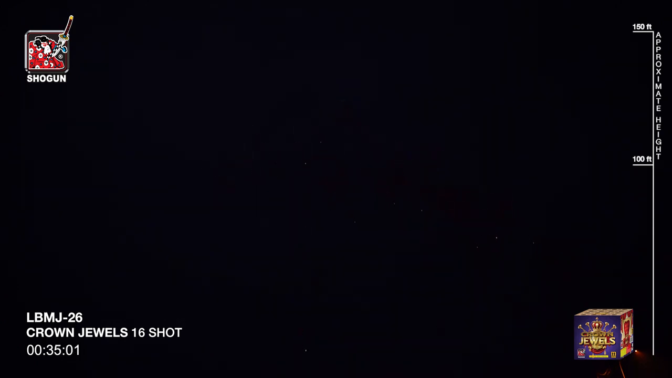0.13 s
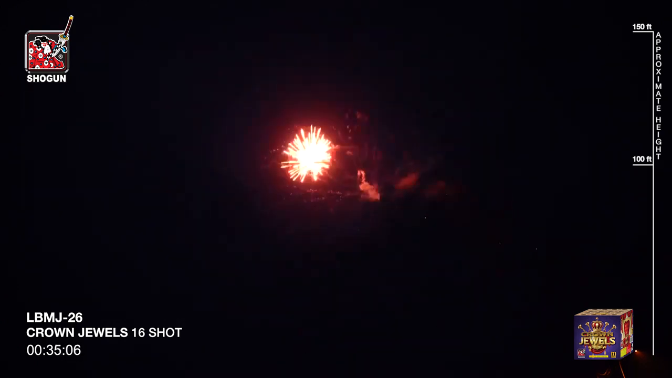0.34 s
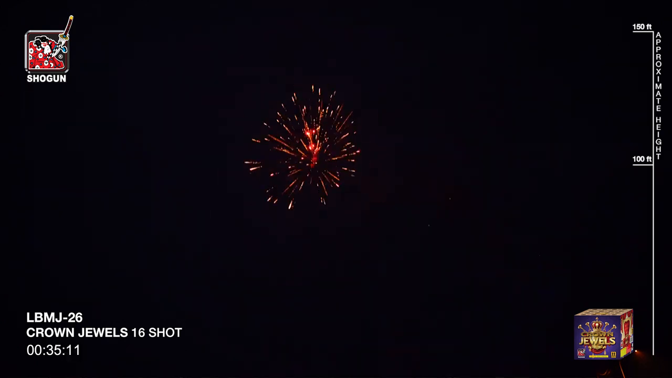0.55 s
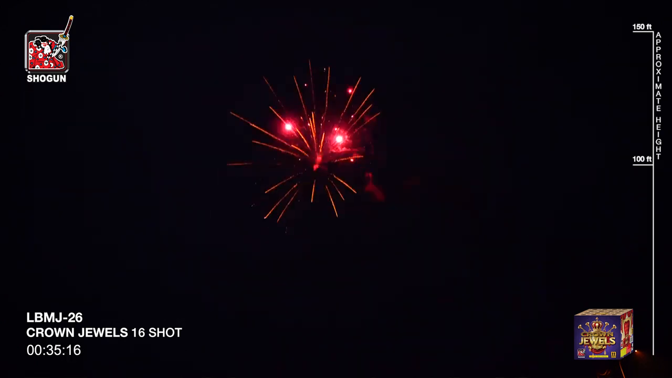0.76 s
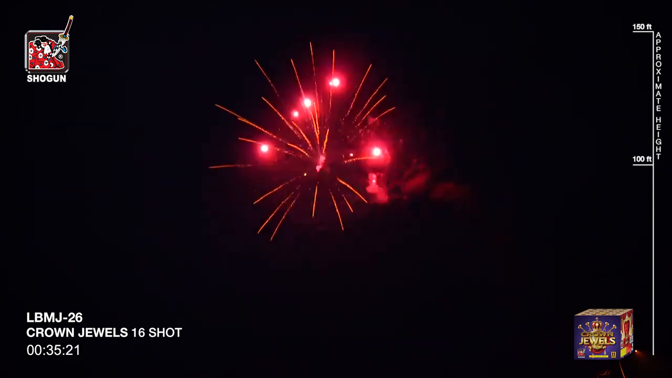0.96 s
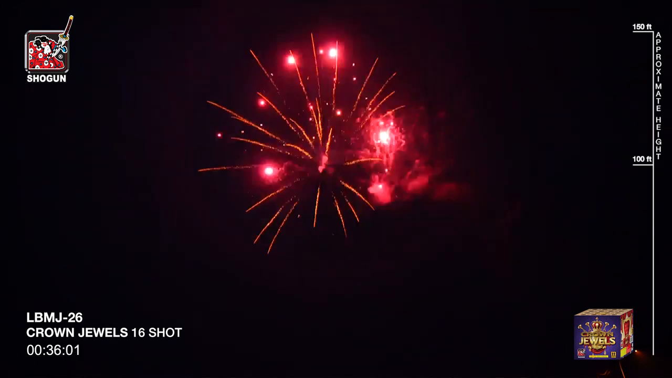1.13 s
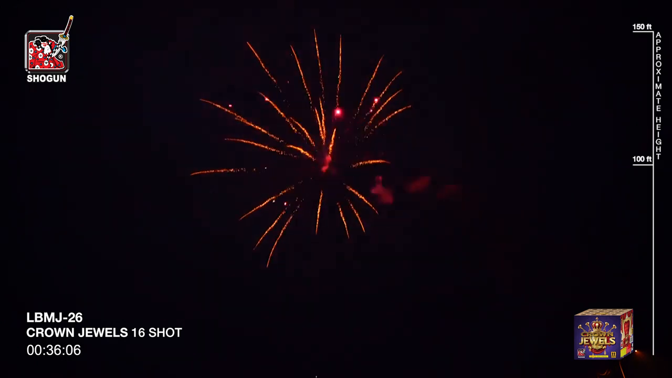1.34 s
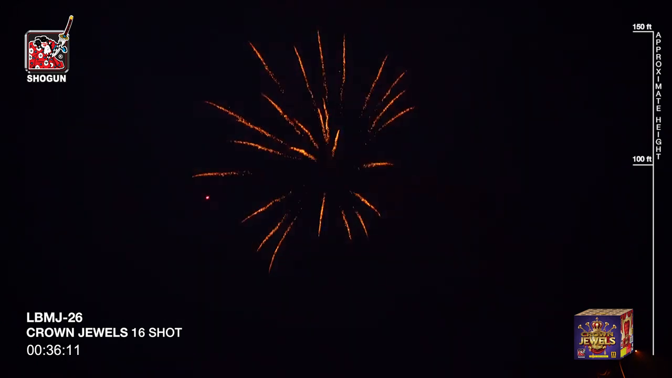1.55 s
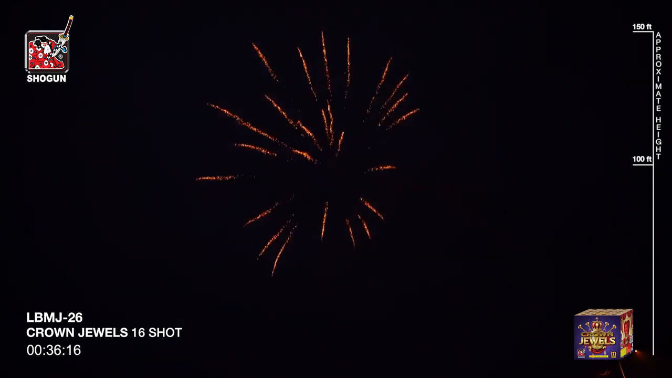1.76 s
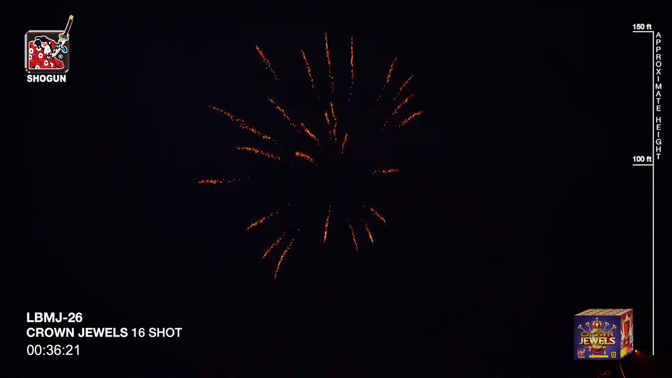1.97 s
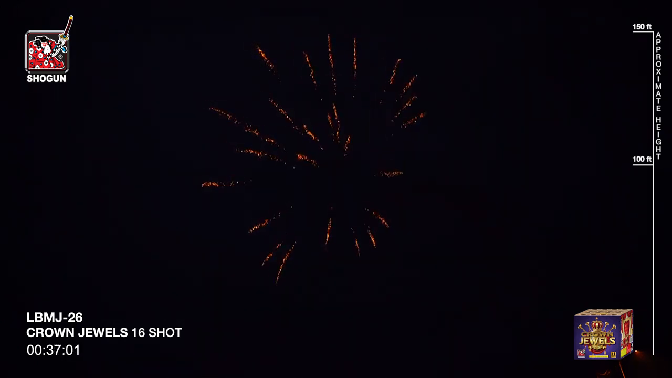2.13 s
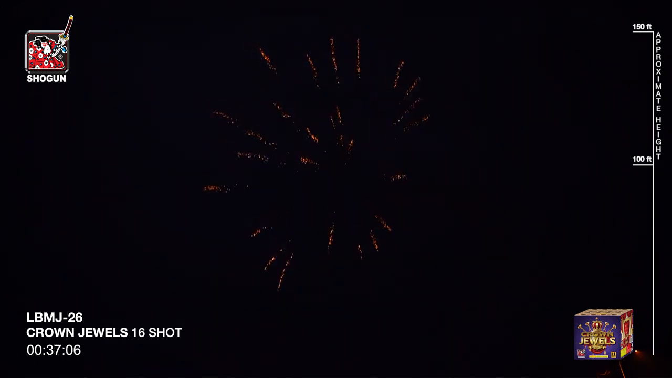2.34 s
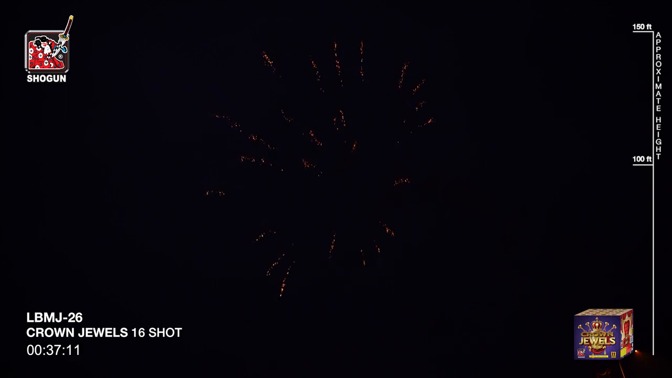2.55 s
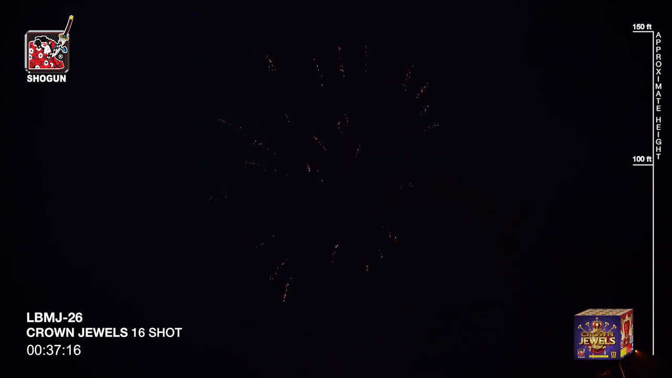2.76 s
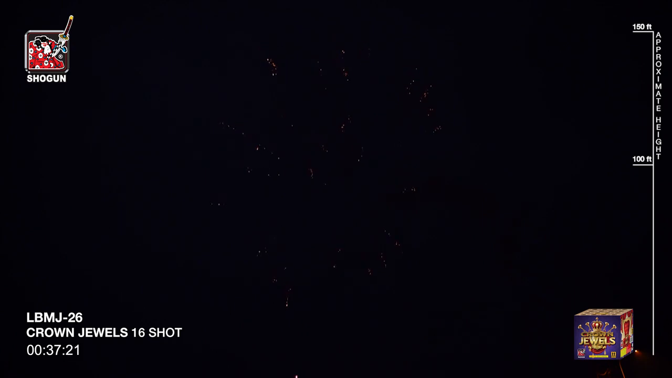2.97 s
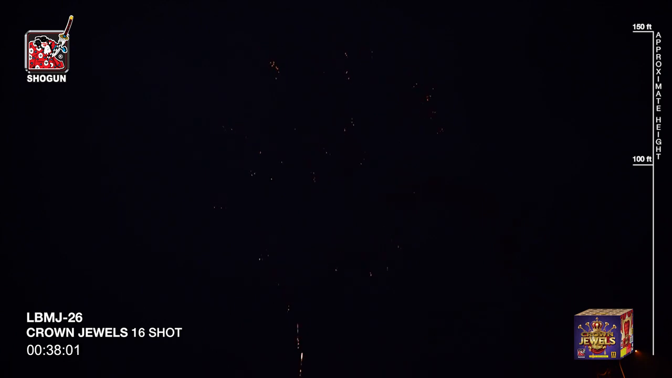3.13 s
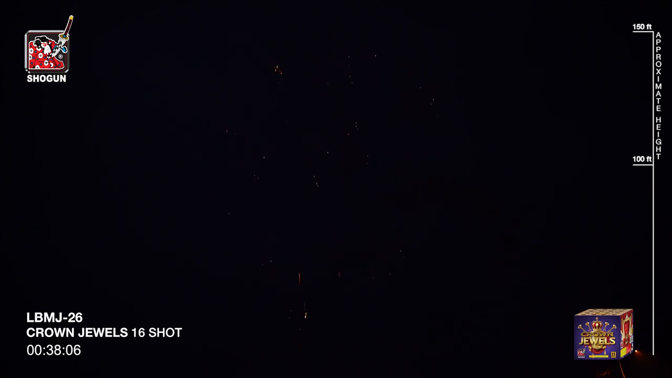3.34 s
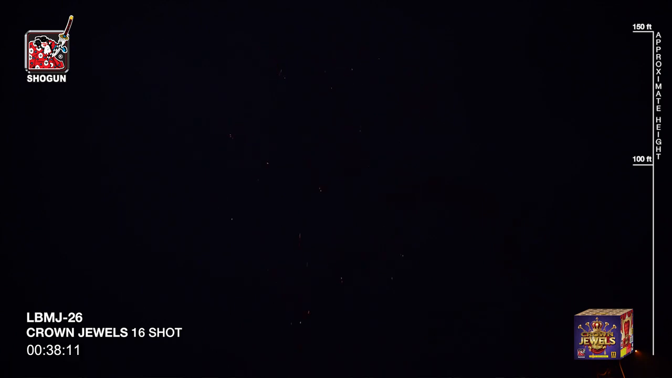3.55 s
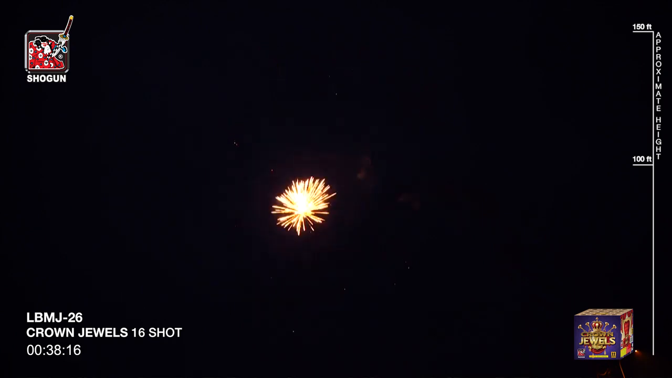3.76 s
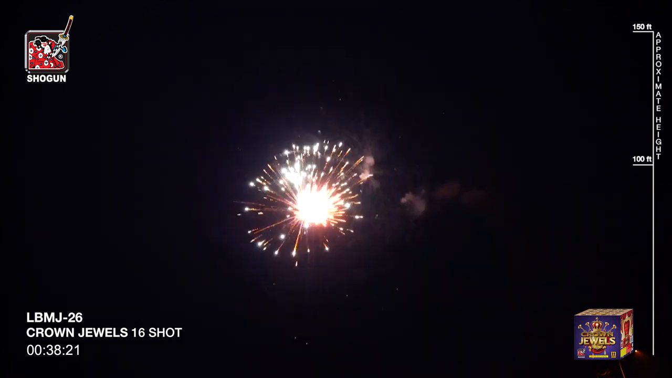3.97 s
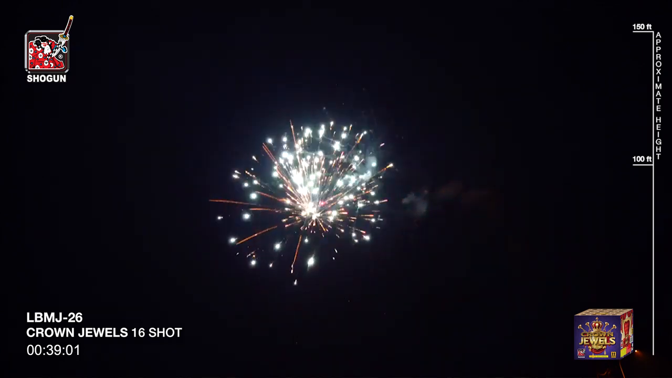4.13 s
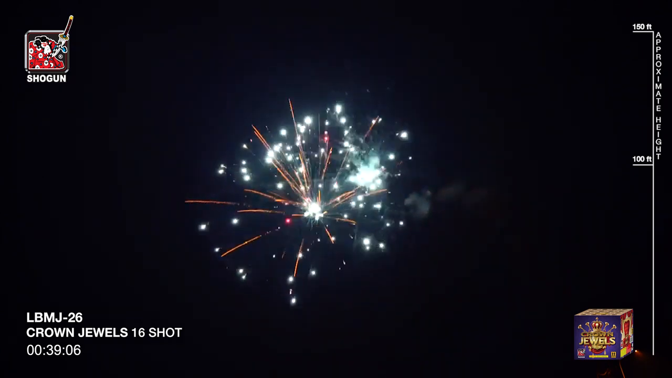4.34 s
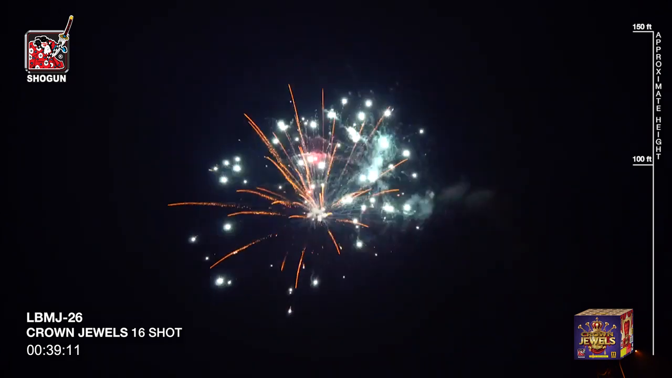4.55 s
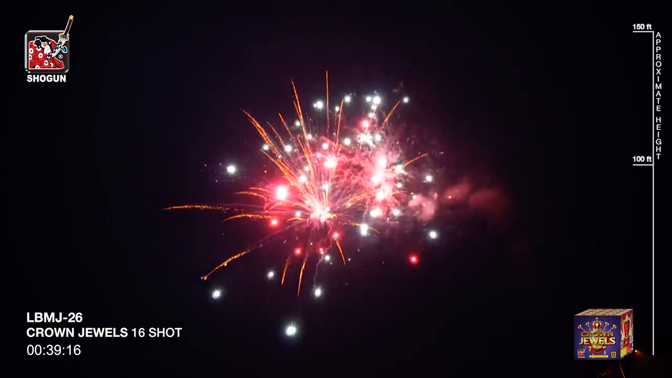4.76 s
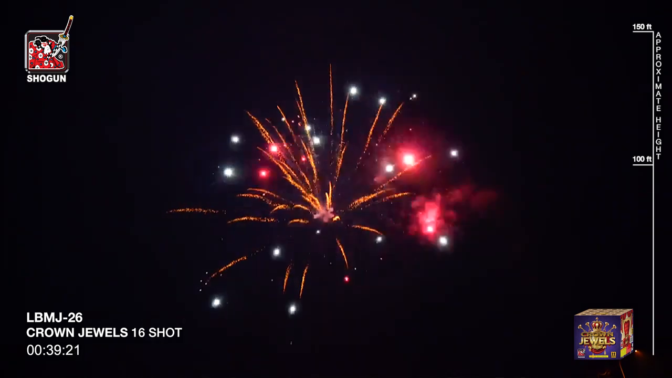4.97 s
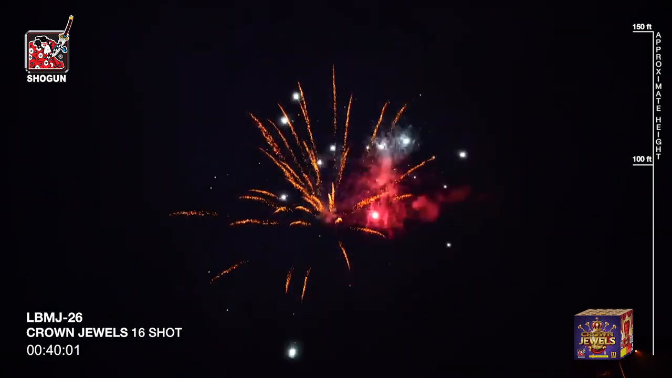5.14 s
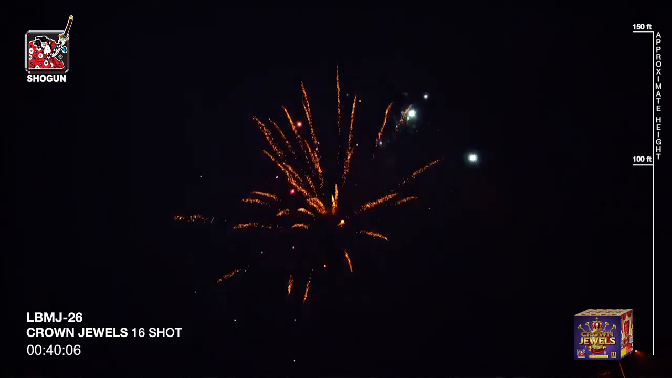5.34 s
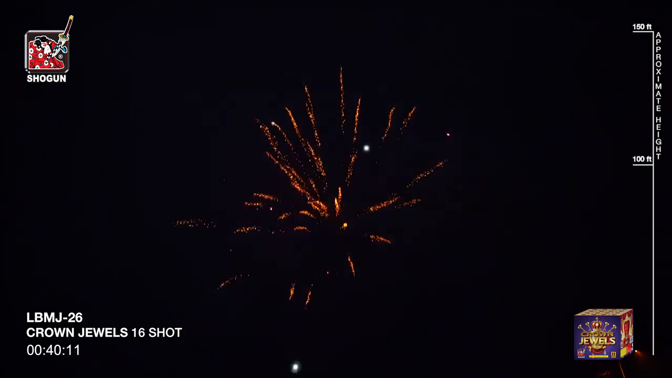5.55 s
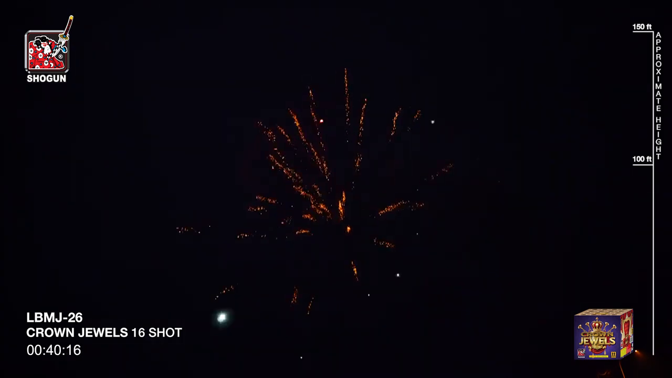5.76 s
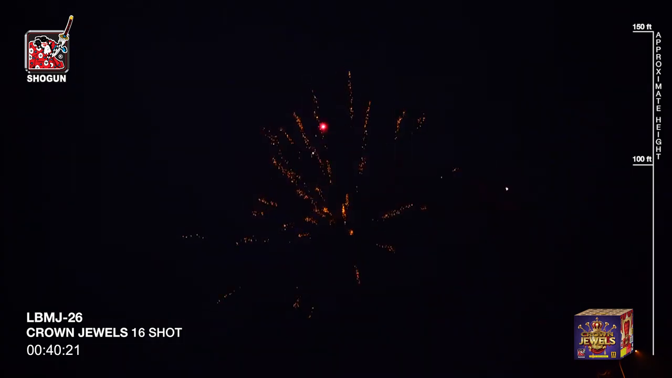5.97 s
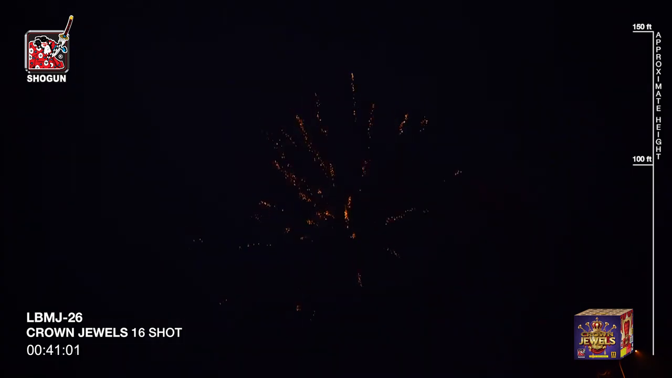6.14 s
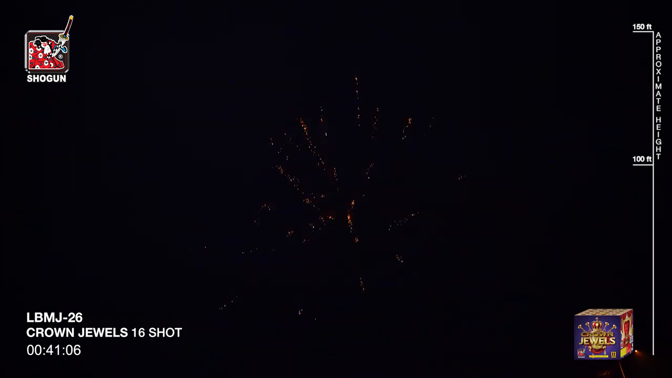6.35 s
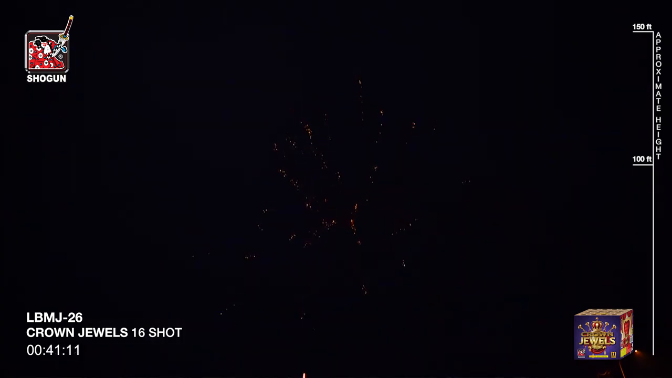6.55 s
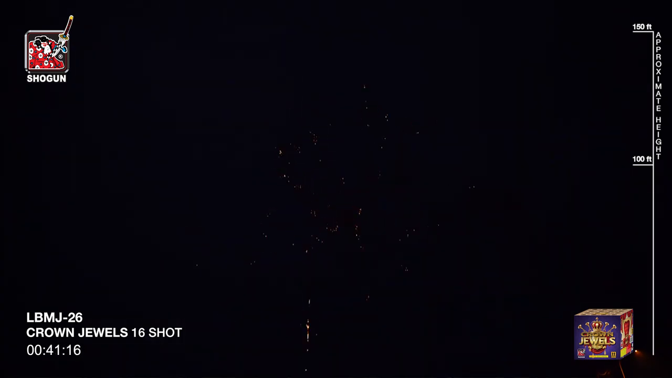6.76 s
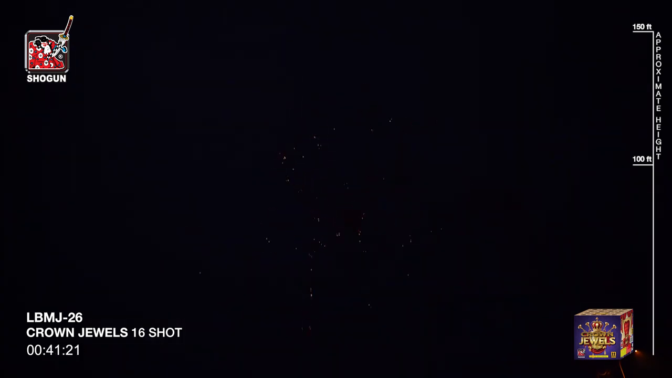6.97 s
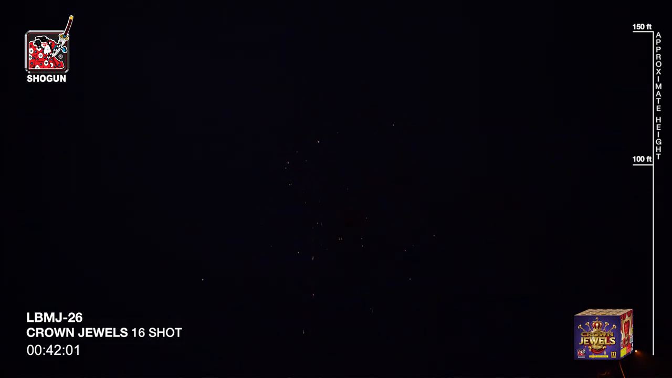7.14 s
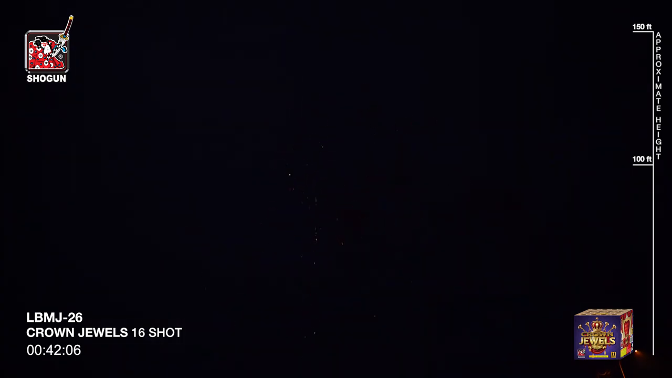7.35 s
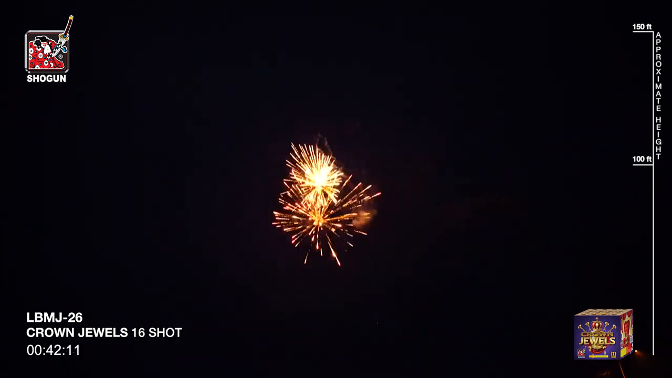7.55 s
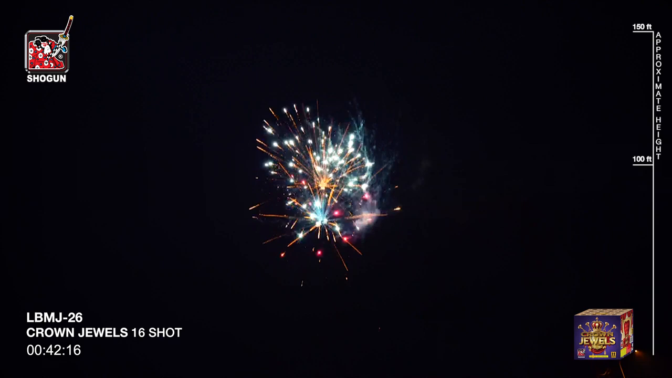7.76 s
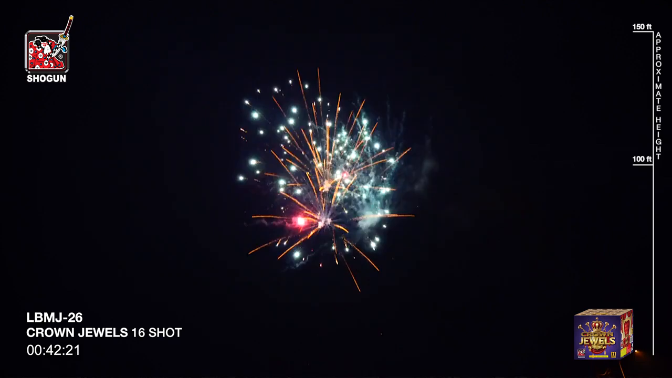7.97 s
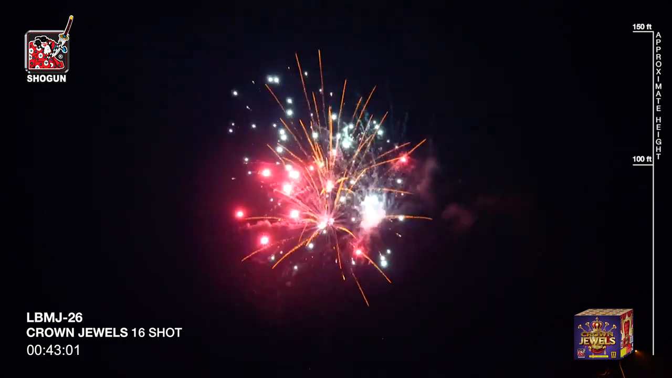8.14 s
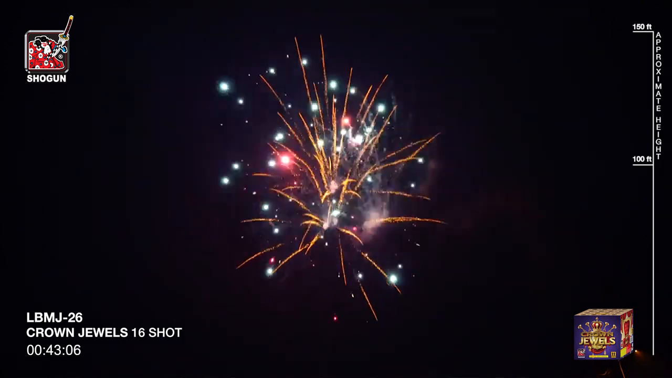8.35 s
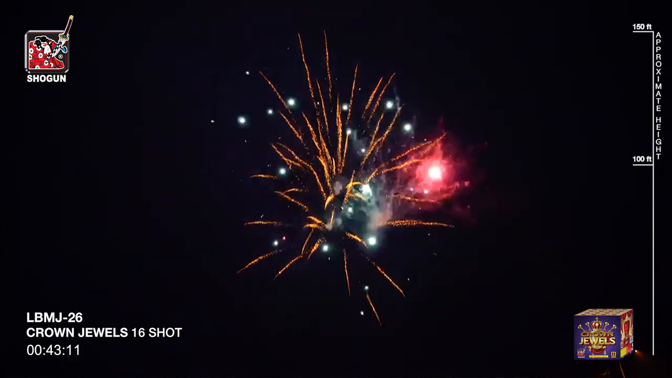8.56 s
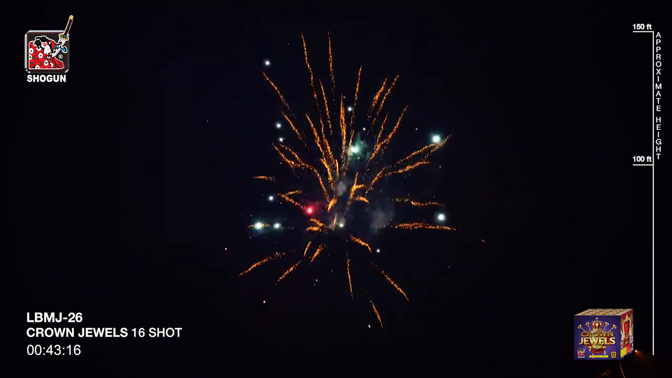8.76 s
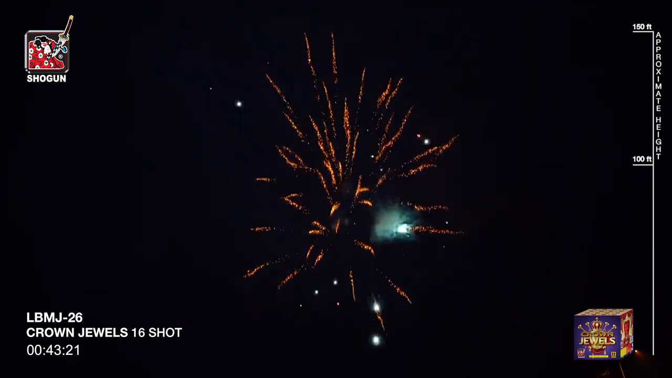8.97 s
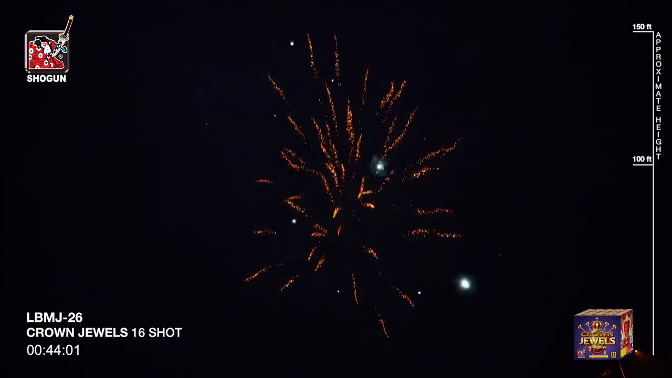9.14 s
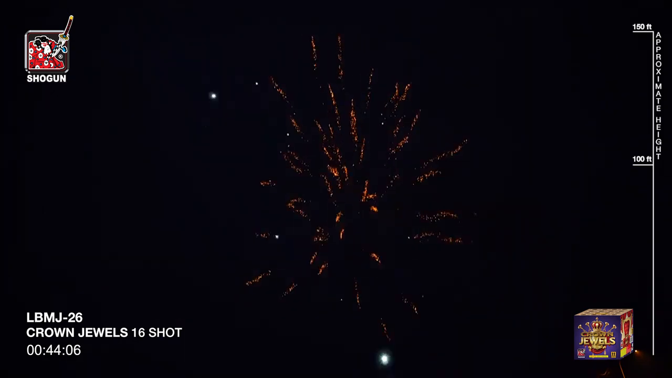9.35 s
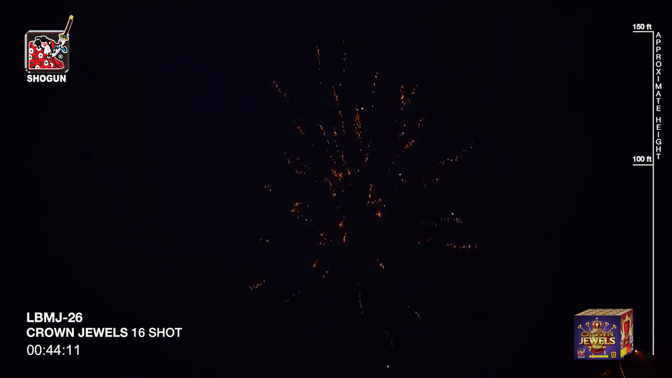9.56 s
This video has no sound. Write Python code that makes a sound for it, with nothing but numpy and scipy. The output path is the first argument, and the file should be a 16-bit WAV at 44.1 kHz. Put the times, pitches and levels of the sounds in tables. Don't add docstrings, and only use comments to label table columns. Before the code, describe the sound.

Faint traffic hum, then one dry, violent aerial crack with quick wall slaps and a dulling roll. Weak sizzling and tiny ticks follow. A punchy ground-level launch precedes two overhead blasts a quarter second apart, then a snapping star. Another, softer launch brings a pair almost merged into one. Stereo outdoor capture in a yard, peaks limited, deep bass and extreme treble missing.

```python
import sys
import numpy as np
from scipy import signal
from scipy.fft import rfft, irfft, next_fast_len
from scipy.io import wavfile
from scipy.ndimage import uniform_filter1d

SR = 44100
rng = np.random.default_rng(int(sys.argv[2]) if len(sys.argv) > 2 else 0)


def transcribe(u):
    v = np.clip(np.atleast_2d(u).T, -1, 1)
    q = np.round(v * 32767).astype(np.int16)
    wavfile.write(sys.argv[1], SR, q)


def amplitude_ratio(level_db):
    exponent = np.asarray(level_db, float) / 20
    return 10 ** exponent


N = 423801

# time in seconds,
# level in dB.
TRAFFIC_LEVEL = [(0, -38.5), (.55, -39.5), (1.5, -45), (2.2, -46), (2.6, -46.5), (2.96, -44), (3.9, -49.5),
                 (5.5, -58.5), (6, -58), (6.5, -52), (7.3, -50.5), (7.68, -48), (9, -50), (9.61, -46.5)]
# frequency in Hz, density in dB per Hz.
TRAFFIC_COLOUR = [(35, -58), (60, -35), (133, -19), (167, -33), (193, -12), (262, -12.5), (296, -8),
                  (484, -3.5), (672, -2.5), (1050, -0.5), (1720, -3.5), (2290, -11.5), (3250, -16),
                  (4330, -23.5), (8000, -42), (10400, -58), (17600, -120)]
# frequency in Hz, side minus mid in dB.
WIDTH = [(60, -15), (110, -30), (190, -29), (350, -20), (630, -12.5), (1120, -7), (2020, -6), (3630, -0.5),
         (6520, 0.5), (11700, -4)]
# start in seconds, level in dB, burn in seconds, fade in dB per second.
FLARES = [(-.1, -62, .7, 60), (1.06, -61, .05, 80), (1.27, -63, .07, 90), (1.35, -58.5, .01, 200),
          (1.39, -56.5, 0.16, 150), (1.57, -64, .03, 150), (1.64, -61, .01, 200), (1.7, -62, .015, 300),
          (1.72, -68, .02, 40), (1.845, -67, .01, 200), (1.92, -67, 0.037, 200), (2.0, -74, .05, 10),
          (2.53, -78, .01, 100), (4.6, -62, .03, 63), (4.96, -64.5, .19, 60), (5.16, -63, .01, 50),
          (5.6, -73, .1, 60), (5.73, -71, .05, 60), (5.81, -67, .09, 202), (5.994, -70.5, .01, 70),
          (6.22, -74.5, .06, 79), (7.5, -84, .2, 50), (8.2, -65, .05, 30), (8.44, -62.5, .24, 250),
          (8.72, -63, .01, 125), (8.775, -66, .01, 150), (8.8, -68, .02, 18), (9.24, -77, .04, 40),
          (9.45, -89, .2, 23)]
# frequency in Hz, density in dB per Hz.
FIZZ_COLOUR = [(1500, -43), (3000, 3), (5000, 0), (8000, 0), (11000, -6.5)]
# start in seconds, peak in dB, shock length in ms.
BURSTS = [
    (.5602, -6, 1.2),
    (3.9749, -6, 1.2),
    (4.2053, -5, 1.2),
    (7.7009, -6, 1.25),
    (7.7945, -7, 1.2),
]
# start in seconds, peak in dB, shock length in ms.
LIFTS = [
    (2.9794, -1, .6),
    (6.5383, -4, .6),
]
# start in seconds, peak in dB, shock length in ms.
POPS = [
    (1.36, -46, .2),
    (1.85, -48, .2),
    (2.53, -50, .2),
    (5.1508, -16, .36),
    (5.995, -52, .2),
    (6.19, -55, .2),
    (6.22, -55, .2),
]
# delay in ms, level in dB, stretch of the shock as a ratio.
BURST_SLAPS = [(0, 0, 1), (1.7, -7, 1.2), (2.5, -4, 1.1), (8.5, -6, 1.3), (18.7, -3, 1.3), (20.6, -5, 1.2),
               (31, -9, 1.1), (50, -5, .9), (71, -2, 1.1)]
LIFT_SLAPS = [(-3.3, -21, 1.8), (0, 0, 1), (2.1, -9, 1.15), (22.2, -7, 1.02), (31.6, -4, 1.15),
              (45, -8, 1.5), (56, -4, 1.05), (62.2, -6, 1.1), (78, -9, 1.05), (118.5, -7, 1.05)]
POP_SLAPS = [(0, 0, 1), (3, -10, 1.5), (19, -14, 1.5), (32, -15, 1.5)]
# frequency in Hz, density in dB per Hz.
ROLL_COLOUR = [(15, -67), (25, -36), (108, -23.5), (139, -15), (167, -15), (233, -3.5), (379, -3),
               (478, -0.5), (587, -5.5), (1030, -6), (1440, -11.5), (1810, -10.5), (8450, -32.5),
               (10600, -33.5), (11500, -52), (15000, -84), (22000, -120)]
ANCHOR_HZ = (150, 430, 1000, 2500, 5000)
# low edge in Hz, high edge in Hz.
ROLL_EDGES_HZ = ((80, 250), (250, 700), (800, 2500), (3500, 7000))
# age in seconds, level in dB.
BURST_ECHO = [(0, 0.5), (.05, -0.5), (.12, -0.5), (.27, -9), (.36, -8), (.48, -7), (.6, -14), (.9, -21.5),
              (1.5, -31.5)]
LIFT_ECHO = [(0, 0), (.05, -1), (.17, 0), (.34, -8.5), (.4, -10.5), (.58, -11.5), (.7, -18), (.8, -21.5),
             (1.2, -28.5)]
POP_ECHO = [(0, -3), (.01, -4), (.08, -12.5), (.4, -36.5)]
# offset in dB, held back at first in dB, lost with distance in dB.
BURST_TONE = [
    (-4, 18, 6),
    (4, 1, 2),
    (1, 0.3, 0.7),
    (-8, 8, 14),
]
LIFT_TONE = [
    (-11, 9.3, 9.6),
    (-3.5, 4, 0.93),
    (-1, .1, .1),
    (-11, 3.9, 26.4),
]
POP_TONE = [
    (-38, .1, .1),
    (3.5, .1, .1),
    (0.5, .1, .1),
    (-2, .1, 13),
]
# delay in seconds,
# boost in dB, centre in Hz.
BURST_FACES = [(0.056, 3.5, 2300), (0.059, 1, 130), (.085, -3, 980), (.11, 0, 500), (.2, 4.5, 200),
               (0.32, -1, 314), (0.455, 0.5, 520), (0.39, 0.5, 2600), (0.161, 4, 420), (0.095, 2.5, 500),
               (.195, -2.5, 600), (0.255, 2, 500), (0.576, -1.5, 350), (0.028, 1.5, 12000)]
LIFT_FACES = [(.05, 2, 1500), (.08, -4, 1000), (.11, 3.5, 1500), (.13, -1.5, 1000), (.165, 1, 400),
              (.5, 3, 150), (.6, 3, 500), (.45, 0, 3200)]
# level in dB, back-off of the gain control in dB, boom in dB, brightness in dB.
BURST_ROLLS = [
    (-19.5, 0.64, -0.5, 2.5),
    (-21, 2, -2.8, 1.3),
    (-20, 6, 1.5, 2.1),
    (-22.5, 0, -3, 0.5),
    (-24.5, 0, 4, 2.5),
]
LIFT_ROLLS = [
    (-21, .1, .1, .1),
    (-23.5, 0.71, 1.9, .1),
]
POP_ROLLS = [
    (-36.5, .1, .1, .1),
]

BANDS_HZ = 25 * 2 ** (np.arange(27) / 3)
ROLL_BANDS_HZ = np.r_[BANDS_HZ[6:22:2], BANDS_HZ[22:], 11000]
STEP = 32
SLOW_T = np.arange(0, N + STEP, STEP) / SR

TRAFFIC_PAN_DB, TRAFFIC_LAG = -2.0, 3
LOUD_TILT, LOUD_BASS = 0.38, .45
FLARE_RISE_DB_S = 300
BURST_SUCTION, LIFT_SUCTION, POP_SUCTION = 1.5, .65, .45
DIP, DIP_MS, LIFT_DIP, POP_DIP = .8, .042, 1.0, 1.35
LIFT_DULL_HZ, LOW_CUT_HZ = 5000, 175
BURST_LULL_MS, BURST_WALL_MS = 11.0, 18.5
LIFT_LULL_MS, LIFT_WALL_MS = 25.0, 22.0
GRAINS_PER_S, GRAIN_DB = 5500, 2.2
BURST_FILL_S, BURST_DULL_S = 0.033, 0.39
LIFT_FILL_S, LIFT_DULL_S, POP_DULL_S = 0.054, 1.37, 0.24
ROLL_WAIT_S, BACK_OFF_S, FADE_DB_S = .0015, .25, 11.5
FACE_S, FACE_OCTAVES = 0.0089, 1.26
AIR_POWER, TREBLE_LULL = 1.99, 0.33
CEILING, RUMBLE_CUT_HZ, TOP_HZ = .85, 67, 11150


def on_log(table, hz):
    table_hz, db = np.transpose(table)
    return np.interp(np.log(hz), np.log(table_hz), db)


def bands(colour, mid, side, centres_hz):
    size = next_fast_len(N)
    hz = np.maximum(np.arange(size // 2 + 1) * SR / size, 1)
    mid = rfft(mid, size) * amplitude_ratio(on_log(colour, hz))
    side = rfft(side, size) * amplitude_ratio(on_log(colour, hz) + on_log(WIDTH, hz) + 0.2)
    place = np.interp(np.log(hz), np.log(centres_hz), np.arange(len(centres_hz)))
    for k, centre_hz in enumerate(centres_hz):
        window = np.cos(np.pi / 2 * np.clip(place - k, -1, 1)) ** 2
        m = irfft(mid * window, size)[:N]
        s = irfft(side * window, size)[:N]
        yield centre_hz, np.array([m + s, m - s])


def band_rms(colour, lo_hz, hi_hz):
    power = amplitude_ratio(2 * on_log(colour, np.arange(lo_hz, hi_hz)))
    return np.sqrt(np.sum(power) * 2 / SR)


def grains(per_s, spread_db):
    when, sign, size = rng.random((3, N))
    x = (when < per_s / SR) * np.sign(sign - .5) * amplitude_ratio(-spread_db * np.log(.01 + size))
    return x / np.sqrt(np.mean(x ** 2))


def walk(rate):
    k = int(SR / rate)
    held = np.repeat(rng.standard_normal(N // k + 1), k)
    return 0.83 * uniform_filter1d(uniform_filter1d(held, k), k)[:N]


def smooth(slow):
    return np.interp(np.arange(N) / SR, SLOW_T, slow)


def traffic():
    db = np.interp(np.arange(N) / SR, *np.transpose(TRAFFIC_LEVEL))
    above_mean_db = db - db.mean()
    hum = 0
    for hz, band in bands(TRAFFIC_COLOUR, *rng.standard_normal((2, N)), BANDS_HZ[9::3]):
        tilt = LOUD_TILT * max(np.log2(hz / 1500), 0) + LOUD_BASS * (hz < 250)
        hum = hum + band * amplitude_ratio(0.94 * walk(4) + above_mean_db * tilt)
    left = np.roll(hum[0], TRAFFIC_LAG) * amplitude_ratio(TRAFFIC_PAN_DB)
    return np.array([left, hum[1]]) * amplitude_ratio(db) / band_rms(TRAFFIC_COLOUR, 25, 13000)


def fizz():
    (_, sparks), = bands(FIZZ_COLOUR, grains(9000, 2.24), grains(9000, 2.5), [5000])
    s, db, burn_s, fade = np.transpose(FLARES)[:, :, None]
    db = db - FLARE_RISE_DB_S * np.maximum(s - SLOW_T, 0)
    db = db - fade * np.maximum(SLOW_T - s - burn_s, 0)
    burning = smooth(np.sqrt(amplitude_ratio(2 * db).sum(axis=0)))
    return sparks * burning * amplitude_ratio(0.81 * walk(21)) / band_rms(FIZZ_COLOUR, 5700, 16000)


def shocks(blasts, slaps, suction, dip_scale=1):
    out = np.zeros((2, N))
    u = np.arange(-20, 300) / SR * 1000
    all_pans = rng.standard_normal((len(blasts), len(slaps)))
    for (s, db, ms), pans in zip(blasts, all_pans):
        for (delay_ms, slap_db, stretch), pan in zip(slaps, pans):
            at = (s + delay_ms / 1000) * SR
            age_ms = u - at % 1 / SR * 1000
            x = age_ms / (ms * stretch)
            swing = np.cos(np.pi * np.clip(x, 0, 1))
            swing = np.where(swing < 0, suction * swing, swing)
            front = .5 + .5 * np.tanh(age_ms / (.03 * stretch ** 3))
            back = .5 - .5 * np.tanh((x - 1) / .2)
            dip = dip_scale * DIP / stretch ** 3 * np.exp(-(age_ms / DIP_MS + 1.4) ** 2)
            gain = amplitude_ratio(db + slap_db + pan * np.array([[1], [-1]]))
            out[:, int(at) - 20:int(at) + 300] += (swing * front * back - dip) * gain
    return out


def bursts():
    return shocks(BURSTS, BURST_SLAPS, BURST_SUCTION)


def lull():
    gain = np.ones(N)
    t = np.arange(N) / SR * 1000
    for blasts, decay_ms, wall_ms in ((BURSTS, BURST_LULL_MS, BURST_WALL_MS),
                                      (LIFTS, LIFT_LULL_MS, LIFT_WALL_MS),
                                      (POPS[3:4], BURST_LULL_MS, BURST_WALL_MS)):
        for s, *_ in blasts:
            age = t - s * 1000
            gain *= np.where((age > 0) & (age < wall_ms), np.exp(-np.abs(age) / decay_ms), 1)
    return gain


def answer(blasts, rolls, echo, tone, faces, fill_s, dull_s):
    delay, db = np.transpose(echo)
    offset, held, lost = np.transpose(tone)[:, :, None]
    own_db = [[20 * np.log10(band_rms(ROLL_COLOUR, *edges))] for edges in ROLL_EDGES_HZ]
    for (s, *_), (roll_db, back_db, boom_db, bright_db) in zip(blasts, rolls):
        age = np.maximum(SLOW_T - s, 0)
        level = roll_db + np.interp(age, delay, db) - FADE_DB_S * np.maximum(age - delay[-1], 0)
        level -= back_db * (1 - np.exp(-age / BACK_OFF_S))
        level -= 200 * (SLOW_T < s + ROLL_WAIT_S)
        layers = level + offset - held * np.exp(-age / fill_s) - lost * (1 - np.exp(-age / dull_s))
        layers += [[boom_db], [0], [0], [bright_db]]
        clumps = []
        for at, boost, hz in faces:
            spread_s = FACE_S * (1 + 3 * at)
            clumps.append((hz, boost * np.exp(-((age - at) / spread_s) ** 2)))
        yield layers - own_db, clumps


def roll():
    answers = [
        *answer(BURSTS, BURST_ROLLS, BURST_ECHO, BURST_TONE, BURST_FACES, BURST_FILL_S, BURST_DULL_S),
        *answer(LIFTS, LIFT_ROLLS, LIFT_ECHO, LIFT_TONE, LIFT_FACES, LIFT_FILL_S, LIFT_DULL_S),
        *answer(POPS[3:4], POP_ROLLS, POP_ECHO, POP_TONE, [], BURST_FILL_S, POP_DULL_S)]
    out, gap = 0, lull()
    mid, side = grains(GRAINS_PER_S, GRAIN_DB), grains(GRAINS_PER_S, GRAIN_DB)
    for hz, band in bands(ROLL_COLOUR, mid, side, ROLL_BANDS_HZ):
        weights = [np.interp(np.log(hz), np.log(ANCHOR_HZ), w) for w in np.eye(5)]
        air = max(hz / ANCHOR_HZ[-1], 1) ** AIR_POWER - 1
        power = 0
        for (boom, body, crack, treble), clumps in answers:
            db = sum(w * c for w, c in zip(weights, (boom, body, crack, crack, treble)))
            db += np.minimum(treble - crack, 0) * air
            for face_hz, boost in clumps:
                db = db + boost * np.exp(-(np.log2(hz / face_hz) / FACE_OCTAVES) ** 2)
            power += amplitude_ratio(2 * db)
        depth = TREBLE_LULL if hz > ANCHOR_HZ[-2] else 1
        flutter = amplitude_ratio(1.2 * walk(min(hz / 12, 60)))
        out = out + band * smooth(np.sqrt(power)) * flutter * gap ** depth
    return out


def pops():
    return shocks(POPS, POP_SLAPS, POP_SUCTION, POP_DIP)


def lifts():
    muffle = signal.butter(1, LIFT_DULL_HZ, fs=SR, output="sos")
    return signal.sosfilt(muffle, shocks(LIFTS, LIFT_SLAPS, LIFT_SUCTION, LIFT_DIP))


def scene():
    capsule = signal.butter(4, LOW_CUT_HZ, "high", fs=SR, output="sos")
    blasts = signal.sosfilt(capsule, bursts() + pops() + lifts())
    return traffic() + fizz() + blasts + roll()


def top_cut(x):
    return signal.sosfilt(signal.butter(12, 12320, fs=SR, output="sos"), x)


def record(dry):
    x = CEILING * np.tanh(dry / CEILING)
    x = signal.sosfilt(signal.butter(2, RUMBLE_CUT_HZ, "high", fs=SR, output="sos"), x)
    x = signal.sosfiltfilt(signal.ellip(10, .1, 17, TOP_HZ, fs=SR, output="sos"), x)
    return top_cut(x)


dry = scene()
out = record(dry)
transcribe(out)
```